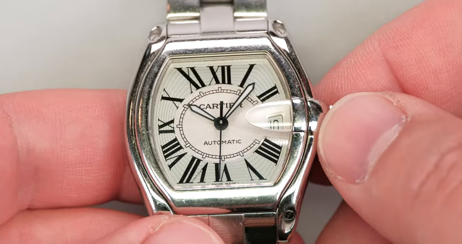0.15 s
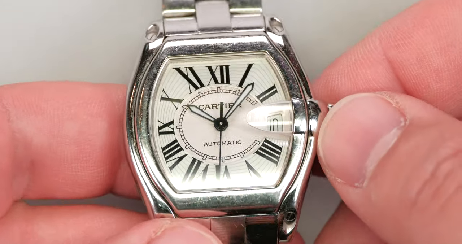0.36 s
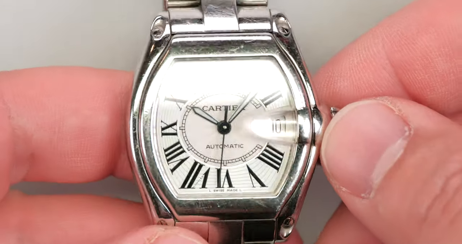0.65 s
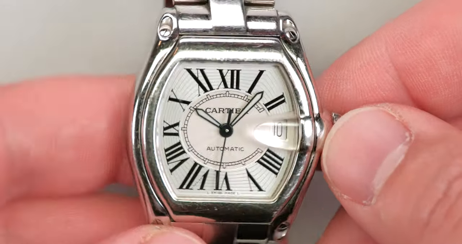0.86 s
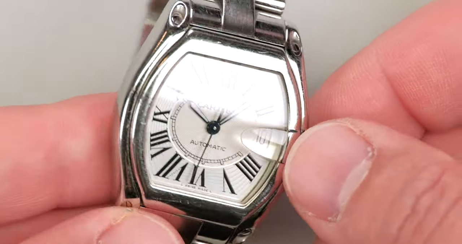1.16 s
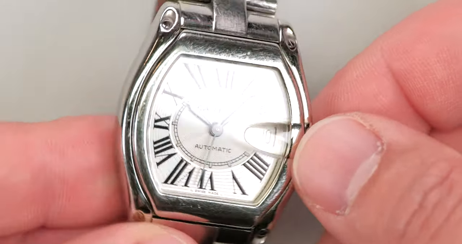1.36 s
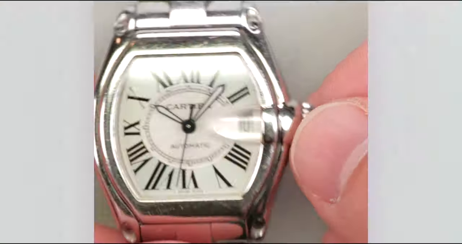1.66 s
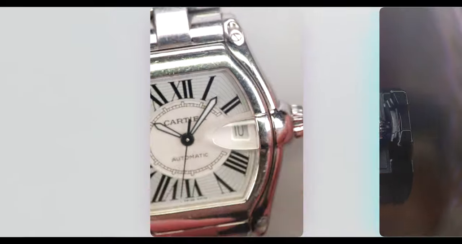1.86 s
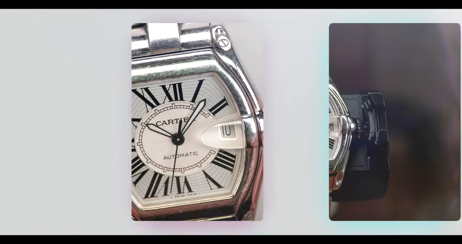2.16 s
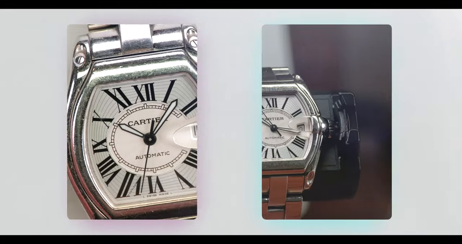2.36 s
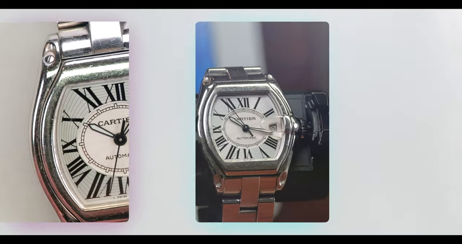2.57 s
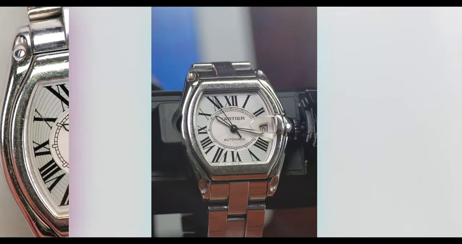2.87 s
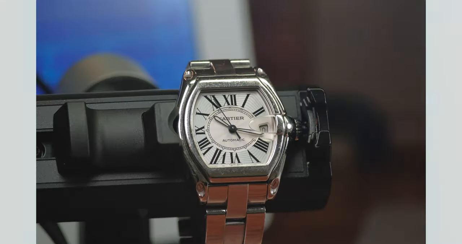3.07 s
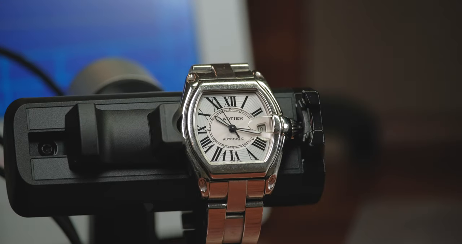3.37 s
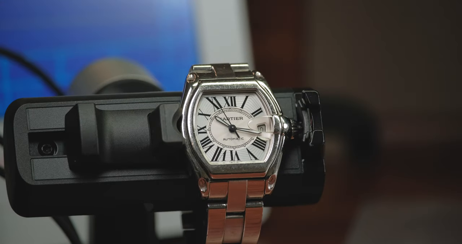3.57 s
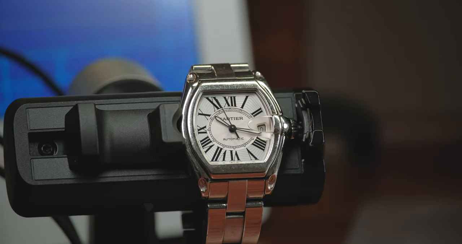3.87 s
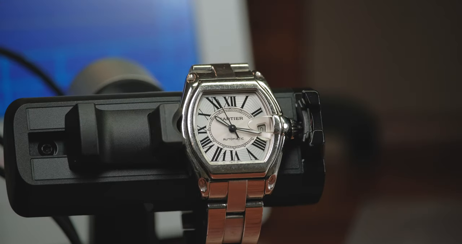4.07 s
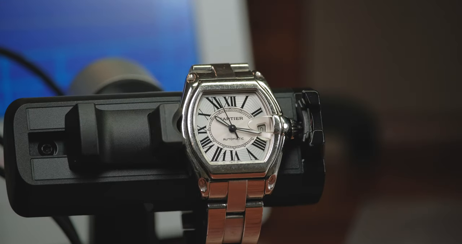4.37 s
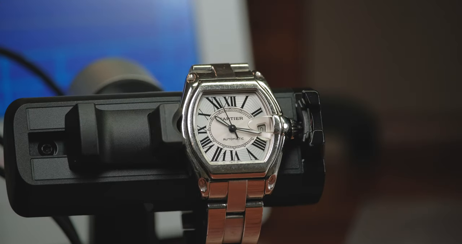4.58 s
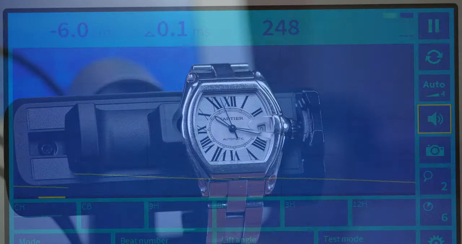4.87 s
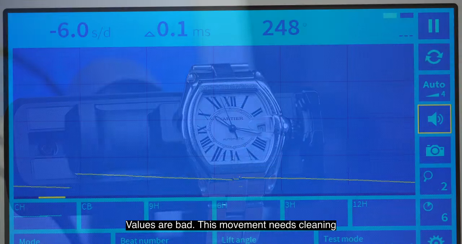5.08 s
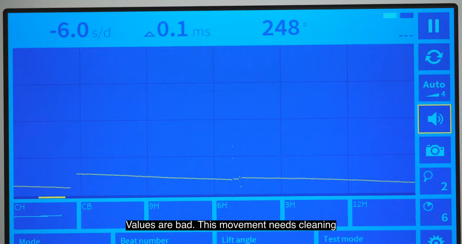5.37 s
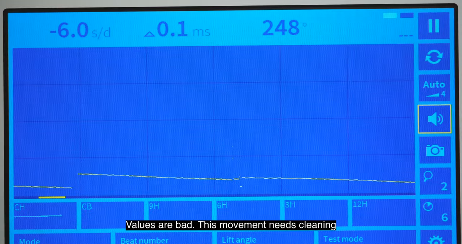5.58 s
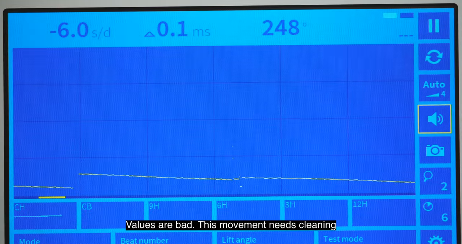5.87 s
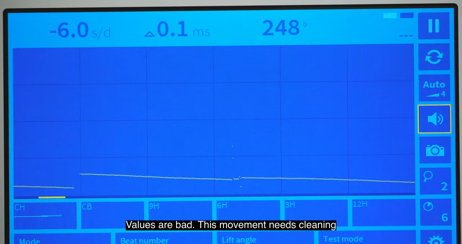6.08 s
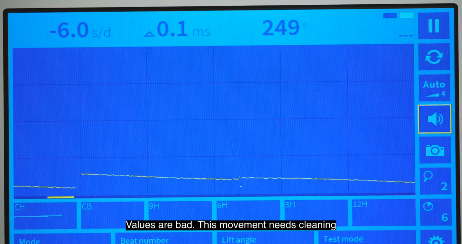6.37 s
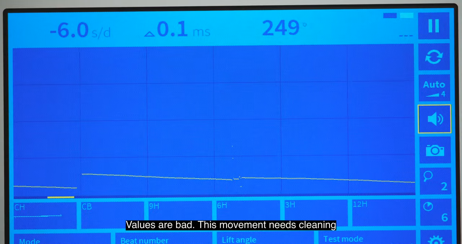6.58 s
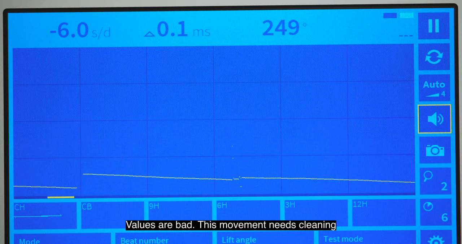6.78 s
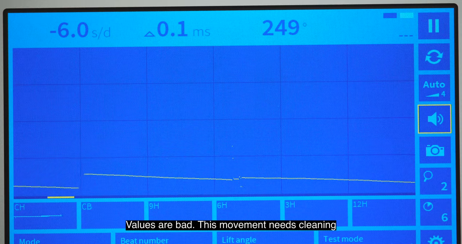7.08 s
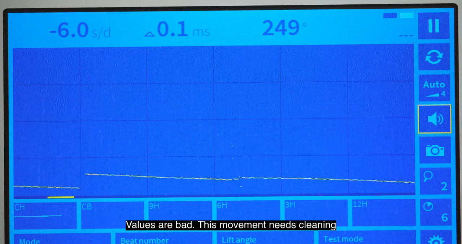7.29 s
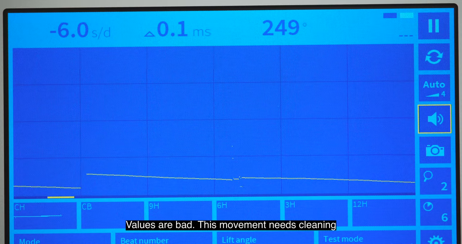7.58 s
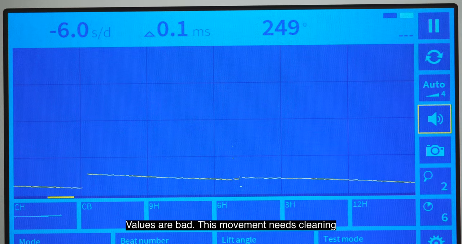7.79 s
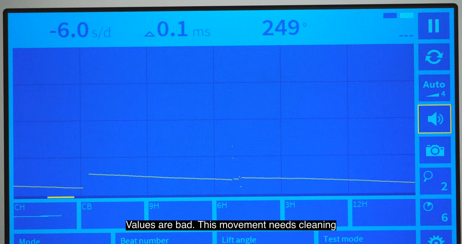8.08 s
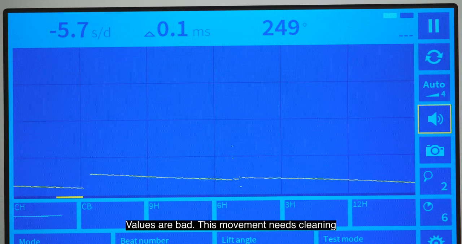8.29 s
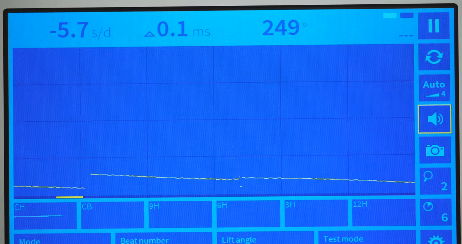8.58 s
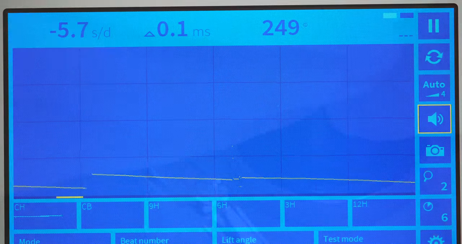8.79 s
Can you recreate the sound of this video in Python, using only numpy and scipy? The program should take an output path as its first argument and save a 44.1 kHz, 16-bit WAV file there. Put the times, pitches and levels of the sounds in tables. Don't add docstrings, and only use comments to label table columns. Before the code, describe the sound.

Close, dull and nearly mono at first: light steel clicks and soft skin rubbing on a watch case, then a hard snapping clack with scattered clicks. The sound widens into stereo hiss and low room rumble as a testing stand amplifies the movement: fast dry ticks, slightly uneven in strength, with a thin ringing haze. A deep soft thump of the bench comes halfway, then ticking goes on with a faint fan hum.

```python
import sys
import numpy as np
from scipy import signal
from scipy.fft import rfft, irfft
from scipy.io import wavfile
from scipy.ndimage import uniform_filter1d

SR = 44100
rng = np.random.default_rng(int(sys.argv[2]) if len(sys.argv) > 2 else 0)


def store_pcm(level_fs):
    pcm = np.round(np.clip(level_fs, -1, 1) * 32767).astype(np.int16)
    wavfile.write(sys.argv[1], SR, np.atleast_2d(pcm).T)


def ratio(d):
    e = np.asarray(d, float) / 20
    return 10 ** e


N = 393372

# frequency in Hz, level in dB, decay t60 in seconds.
THUD = [(205, -6.5, 0.11), (279, -9, 0.022), (327, -8.5, 0.026), (465, -2.5, 0.061), (574, -5, 0.033),
        (937, 0, 0.022), (1310, 7.5, 0.0069)]


def evened(x):
    return x / np.sqrt(np.mean(x ** 2) + 1e-20)


def read(points, hz):
    f, value = np.transpose(points)
    return np.interp(np.log(hz + 1), np.log(f + 1), value)


def add(mix, start_s, sound):
    part = mix[round(start_s * SR):][:len(sound)]
    part += sound[:len(part)]


def colour(x, shape):
    hz = np.fft.rfftfreq(len(x), 1 / SR)
    return irfft(rfft(x) * ratio(read(shape, hz)), len(x))


def ramp(start_s, end_s):
    return np.clip((np.arange(N) / SR - start_s) / (end_s - start_s), 0, 1)


def positions():
    stand = ramp(1.65, 3.03)
    leave_first = ramp(4.77, 5.19)
    second = ramp(4.76, 5.21)
    return np.array([1 - stand, stand * (1 - leave_first), second])


def heard(levels_db):
    return np.sqrt(((ratio(levels_db)[:, None] * positions()) ** 2).sum(0))


def ring(modes, luck, rise_s, spread_db, seconds, stray=0):
    hz, db, t60_s = np.transpose(modes)[:, :, None]
    t, count = np.arange(round(seconds * SR)) / SR, len(modes)
    level = ratio(db + spread_db * luck[:count, None] - 60 * t / t60_s)
    phase = luck[-count:, None]
    hz = hz * (1 + stray * np.sin(20 * phase))
    modes_sum = (level * np.sin(2 * np.pi * (hz * t + phase))).sum(0)
    sound = modes_sum * (1 - np.exp(-t / rise_s))
    return sound / abs(sound).max()


def tail(shape, t60_s, onset_s):
    t = np.arange(SR) / SR
    answer = colour(rng.standard_normal(SR), shape) * ratio(-60 * t / t60_s) * (1 - np.exp(-t / onset_s))
    return answer / np.linalg.norm(answer)


def wash(shape, patchy_db):
    # frequency in Hz, correlation from 0 to 1.
    likeness = [(50, .95), (200, .83), (2800, .76), (3600, .97), (5400, .97), (6300, .3), (16000, .28)]
    frames, hz = N // 512 + 5, np.fft.rfftfreq(2048, 1 / SR)
    a, b, c, d, patches = rng.standard_normal((frames, 1025, 5)).T
    patches = uniform_filter1d(patches, size=16, axis=0)
    patches = evened(uniform_filter1d(patches, size=6, axis=1))
    same = np.clip(read(likeness, hz), 0, 1)[:, None]
    mid = (a + 1j * b) * np.sqrt(1 + same)
    side = (c + 1j * d) * np.sqrt(1 - same)
    z = np.array([mid + side, mid - side]) * ratio(read(shape, hz)[:, None] + patchy_db * patches)
    return evened(signal.istft(z, nperseg=2048, noverlap=1536)[1][:, :N])


def wavering_tone(hz, waver_hz, level_db):
    waver = uniform_filter1d(rng.standard_normal(N), size=1500)
    waver = evened(uniform_filter1d(waver, size=1500))
    return ratio(level_db) * np.sin(2 * np.pi * np.cumsum(hz + waver_hz * waver) / SR)


def background():
    # frequency in Hz, level in dB per Hz.
    murmur_shape = [(35, -33.5), (60, -1), (103, -4.5), (197, -5.5), (417, -12), (577, -14), (639, -14.5),
                    (913, -11), (1010, -16), (1180, -15), (1900, -19), (2410, -24.5), (3500, -30.5),
                    (4550, -41), (7700, -120)]
    hiss_shape = [(300, -4), (2000, 6), (6500, 3.5), (12000, 3.5), (15500, 4), (15780, -2), (15900, -49)]
    rumble_shape = [(8, -16), (18, 16), (45, 1), (70, -15.5), (120, -53.5)]
    # peak in seconds, half length in seconds, rumble rise in dB.
    shakes = [
        (2.85, 0.34, 1.5),
        (4.05, 0.28, 3),
        (5.1, 0.4, 11),
        (6.108, 0.44, 4.5),
        (7.303, 0.36, 6),
        (8.45, 0.25, 10),
    ]
    clack_s, clack_rise_s, clack_hold_s = 1.613, 0.23, 0.11
    t = np.arange(N) / SR
    fades = positions()

    fan = wavering_tone(930, 3, level_db=-79) * (np.array([0, .45, .9]) @ fades)
    whine = wavering_tone(3245, 6, level_db=-86) * fades[2]

    shakes_db = sum(db * np.maximum(1 - abs(t - s) / half_s, 0) for s, half_s, db in shakes)
    rumble = wash(rumble_shape, 1.34).mean(0) * heard((-77.5, -67, -66)) * ratio(shakes_db)

    swell = ramp(clack_s - clack_rise_s, clack_s)
    stir = swell ** 3 * ratio(-54 - 70 * np.maximum(t - clack_s - clack_hold_s, 0))
    murmur = wash(murmur_shape + [(6000, -60)], 1.96) * np.hypot(heard((-74, -71, -69.5)), stir)
    linger = swell * ratio(-74 - 10 * (t - clack_s))
    hiss = wash(hiss_shape, 0.95) * np.hypot(heard((-82.5, -70.5, -70.5)), linger)
    return fan + whine + rumble + murmur + hiss


def knocks():
    # time in seconds, swing peak in dB.
    wobble = [
        (4.7, -51),
        (4.875, -46),
        (4.905, -30),
        (4.95, -28.5),
        (4.99, -34.5),
        (5.07, -35),
        (5.13, -39.5),
        (5.6, -48),
        (5.85, -66),
    ]
    # frequency in Hz, level in dB, decay t60 in seconds.
    bench = [
        (66, -52, 1.3),
        (77, -56, .9),
        (105, -54, .3),
    ]
    bench_s, first_swing_s, onset_s = 4.885, 4.895, .006
    swing_hz, kick_hz, settle_s, rebound_s = 20, 22.5, .07, .3
    s, db = np.transpose(wobble)
    t, out = np.arange(s[0], s[-1], 1 / SR), np.zeros(N)

    since = np.maximum(t - bench_s, 0)
    kick = (1 - np.exp(-since / onset_s)) * np.exp(-since / settle_s)
    hz = swing_hz + kick_hz * kick * np.cos(2 * np.pi * since / rebound_s)
    turns = np.cumsum(hz) / SR
    lean = np.minimum((t - s[0]) / .04, 1)
    swing = np.cos(2 * np.pi * (turns - np.interp(first_swing_s, t, turns)))
    add(out, s[0], lean * ratio(np.interp(t, s, db)) * swing)

    t = t - s[0]
    boom = sum(ratio(db - 60 * t / t60_s) * np.sin(2 * np.pi * hz * t) for hz, db, t60_s in bench)
    add(out, bench_s, (1 - np.exp(-t / onset_s)) * boom)
    return out


def handling():
    # time in seconds, rub level in dB.
    touches = [
        (0.752, -94),
        (0.794, -70.5),
        (1.064, -74),
        (1.18, -68),
        (1.234, -61),
        (1.35, -69.5),
        (1.388, -76),
        (1.47, -69),
        (1.55, -65),
    ]
    rub_shape = [(120, -36), (220, 12.5), (600, -0.5), (1200, -11.5), (3000, -27)]
    scrape_shape = [(500, -29), (1200, -10), (2300, -1), (3700, -2.0), (4500, -17), (9000, -19), (14000, -41)]
    slip_at_db, slip_db, slip_growth, grip_s = -60.5, -69, 1.7, 1.36
    t = np.arange(N) / SR

    body = ring(THUD, np.zeros(14), rise_s=0.0052, spread_db=0, seconds=0.4)
    rub = evened(signal.fftconvolve(rng.standard_normal(N), body)[:N])
    rub = rub + 1.14 * evened(colour(rng.standard_normal(N), rub_shape))

    slip_now = rng.random(N) < 2500 / SR
    slip_size = ratio(2.5 * np.minimum(rng.exponential(1, N), 5))
    scrape = colour(slip_now * slip_size * rng.standard_normal(N), scrape_shape)

    s, db = np.transpose(touches)
    pressure = ratio(np.interp(t, s, db, left=-120, right=-120))
    slipping = ratio(slip_db) * (pressure / ratio(slip_at_db)) ** slip_growth * (t < grip_s)
    return evened(rub) * pressure + evened(scrape) * slipping


def clicks():
    # start in seconds, ring, thud and snap levels in dB, ring pitch in Hz.
    contacts = [(0.4902, -49.5, -64, -49, 3020), (0.758, -55, -77, -55.5, 2930),
                (1.1452, -67, -66, -66, 4600), (1.3959, -62, -63.5, -70, 1820),
                (1.4317, -42, -53, -44.5, 2160), (1.4473, -61, -57, -54, 2220),
                (1.503, -50, -77, -51.5, 2750), (1.5584, -27, -39, -32, 4050),
                (1.5634, -32, -41, -41, 1620), (1.595, -47, -63, -54.5, 2660),
                (1.6291, -18.5, -31, -32, 2470), (1.645, -47, -51, -48, 3050),
                (1.6779, -32.5, -49, -42.5, 2370), (1.6866, -34, -40.5, -43, 2760),
                (1.6945, -53, -46.5, -47, 2730), (1.711, -56, -61, -45, 2780),
                (1.7278, -56, -48.5, -47, 2250), (1.74, -42, -55, -57, 2180), (1.7616, -46, -50, -56, 2190),
                (1.9777, -58, -65.5, -65, 4690)]
    # start in seconds, extra snap tilt in dB per octave.
    extra_tilts = [
        (0.4902, 6),
        (0.7576, -5),
        (1.503, 2.5),
    ]
    # frequency in Hz, level in dB, decay t60 in seconds.
    steel = [(1780, -5.5, .012), (2223, -1, 0.014), (2750, -5.5, 0.012), (3140, -2.5, 0.013),
             (3460, 0, 0.01), (3950, -2.5, 0.0091), (4940, -2, 0.0079)]
    # frequency in Hz, level in dB.
    snap_shape = [(2500, -40), (4500, -3), (6500, -4), (9000, -3.5), (12000, -1), (14500, -7.5),
                  (16500, -1)]
    room_shape = [(60, -9), (130, -8), (200, -3), (500, -8), (1400, -13), (2200, -10), (2700, -1),
                  (3300, 0), (3800, -10), (5200, -13), (6200, -26), (16000, -38)]
    out, blows, t = np.zeros(N), np.zeros(N), np.arange(2000) / SR
    noises = rng.standard_normal((len(contacts), 2000))
    lucks = rng.standard_normal((len(contacts), 14))
    for (s, ring_db, thud_db, snap_db, hz), luck, noise in zip(contacts, lucks, noises):
        tilt_db = 0.5 + 0.55 * (snap_db - ring_db) - 12 * np.log2(hz / 2500)
        tilt_db += sum(db for at, db in extra_tilts if abs(at - s) < .005)
        snap = evened(colour(noise, [(f, db + tilt_db * np.log2(f / 9000)) for f, db in snap_shape]))
        snap_fall = ratio(snap_db + 3.5 - 60 * t / 0.01) + ratio(snap_db - 10 - 60 * t / 0.051)
        near = [(f, db - 10 * abs(np.log2(f / hz)), t60_s) for f, db, t60_s in steel]
        ringing = ring(near, luck, rise_s=.0008, spread_db=1.5, seconds=.06)
        thud = ring(THUD, luck[::-1], rise_s=.0006, spread_db=1.5, seconds=.3)
        add(out, s, snap_fall * snap)
        add(out, s + .0006, ratio(ring_db) * ringing)
        add(out, s + .0006, ratio(thud_db + 6) * thud)
        add(blows, s, ratio([ring_db]))
    room = tail(room_shape, t60_s=0.73, onset_s=0.0012)
    return out + ratio(2.5) * signal.fftconvolve(blows, room)[:N]


def escapement(count, start_s, fade, kinds, uneven, modes, shimmer, halo, halo_db, halo_t60_s):
    # frequency in Hz, level in dB.
    crack_shape = [(1500, -19), (3200, -10.5), (4200, 1), (5600, 3), (6300, -23.5), (10000, -15),
                   (15000, -26)]
    beat_s, lock_jitter_s, blow_jitter_db = .12503, .0004, 1.0
    crack_db, crack_t60_s = -13.5, 0.016
    after_ring_db, after_ring_t60_s = 5.5, 0.046
    out, blows, cracks = np.zeros((3, N))
    burst = ratio(crack_db - 60 * np.arange(900) / SR / crack_t60_s)
    changes = {int((s - start_s) / beat_s + .5): np.array(db) for s, *db in uneven}
    for k, luck in enumerate(rng.standard_normal((count, 3, 34))):
        free_s = start_s + k * beat_s
        free_db, push_db, lock_db, shine_db, wait_s = kinds[k % 2]
        fade_db = 20 * np.log10(fade[round(free_s * SR)] + 1e-3)
        change_db = changes.get(k, blow_jitter_db * luck[:2, -1])
        free_db, lock_db = np.array([free_db, lock_db]) + change_db + fade_db
        lock_s = free_s + wait_s + lock_jitter_s * luck[2, -1]
        steps = [(free_s, free_db - 3.0, -2.5),
                 (free_s + .0040, free_db + push_db, -1.5),
                 (lock_s - .0008, lock_db, -2.5)]
        for (s, db, shine_rel_db), chance in zip(steps, luck):
            body = ring(modes, chance[:22], rise_s=.002, spread_db=2.5, seconds=.05, stray=.035)
            shine = ring(shimmer, chance[22:], rise_s=.0007, spread_db=4, seconds=.03, stray=.01)
            add(out, s, ratio(db) * body)
            add(cracks, s, ratio(db) * burst)
            add(out, s, ratio(shine_db + fade_db + shine_rel_db) * shine)
        blow_db = .5 * (max(free_db, lock_db) + fade_db + 46) - 40
        add(blows, lock_s, ratio(blow_db) ** 2 * np.ones(1))
    t = np.arange(SR) / SR
    dying = ratio(-60 * t / halo_t60_s) ** 2
    after = ratio(after_ring_db - 60 * t / after_ring_t60_s) ** 2
    dying = (dying + after) / dying.sum()
    ring_on = np.sqrt(abs(signal.fftconvolve(blows, dying)[:N]))
    out += cracks * evened(colour(rng.standard_normal(N), crack_shape))
    return out + ratio(halo_db) * ring_on * evened(wash(halo, patchy_db=2.5).mean(0))


def first_position():
    # unlocking dB, push over unlocking dB, locking dB, shimmer dB, locking delay in seconds.
    kinds = [
        (-46, -4.5, -44.5, -65.5, .0091),
        (-46.5, -2, -42.5, -60.5, .0094),
    ]
    # beat time in seconds, unlocking change in dB, locking change in dB.
    uneven = [(2.0, -3, 0.5), (2.12, 3.5, 1.5), (2.25, 1, 0), (2.75, -1, 0.5), (3.0, 0, 1), (4.25, 2, -4),
              (2.5, 1.5, 1.5), (2.62, -1, 0), (3.12, -1.5, -3.5), (3.25, 1, 2), (3.5, 3, -17), (3.62, 5, 1),
              (3.75, 0, 1), (3.87, 2, 0.5), (4.37, 2, 0), (4.62, -1, 1.5), (4.75, 3.2, -3.5),
              (4.87, 1.5, 1), (5.0, -1, 3)]
    # frequency in Hz, level in dB, decay t60 in seconds.
    modes = [(1152, -27.5, 0.045), (1930, -13, 0.016), (2900, -21.5, 0.0077), (2940, -17, 0.021),
             (3794, 1.5, 0.0097), (4200, 1, 0.0054), (4537, 1.5, 0.012), (4832, -2, 0.025),
             (5530, -5.5, 0.023), (6060, -14, 0.0097)]
    shimmer = [(10000, 7, 0.013), (12823, 12, 0.027), (13200, -3, .008), (14500, 16, .01)]
    # frequency in Hz, level in dB.
    halo = [(800, -20), (2000, -19), (2700, -22), (3700, -15), (4150, -11), (4400, -5), (4600, -4),
            (4800, 0), (4900, -3), (5130, -16), (5480, -9), (5750, -14), (6100, -28), (9000, -44)]
    return escapement(27, 1.8648, positions()[1], kinds, uneven, modes, shimmer, halo,
                      halo_db=11.7, halo_t60_s=1.0)


def second_position():
    # unlocking dB, push over unlocking dB, locking dB, shimmer dB, locking delay in seconds.
    kinds = [
        (-45, -1.5, -41, -56.5, .0087),
        (-43, -5.5, -41.5, -53, .0097),
    ]
    # beat time in seconds, unlocking change in dB, locking change in dB.
    uneven = [(5.41, 0, 1.5), (5.53, 1.1, 2), (5.78, 2.5, -0.5), (5.91, -2, -3.5), (6.15, 1.5, -5),
              (6.28, 0, -3), (6.41, -1, -2.5), (6.53, -2, 1), (6.66, -0.5, 3), (7.16, 5, -4),
              (7.28, -1.5, -1), (7.41, 2, 2), (7.66, 4, -19), (7.78, .6, 1.5), (8.03, -2.5, -2),
              (8.16, 0.5, 1), (8.41, 3.5, -2.5), (8.53, 1, 1), (8.66, 2.5, 2.5)]
    # frequency in Hz, level in dB, decay t60 in seconds.
    modes = [(1220, -20, 0.021), (1567, -28, 0.029), (1874, -21, 0.028), (2226, -27, 0.04),
             (2863, -18.5, 0.021), (3500, -9, 0.013), (4110, 0.5, 0.011), (4690, 0, 0.012),
             (5030, -1, 0.015), (5530, 1, 0.013), (5970, -7.5, 0.011)]
    shimmer = [(10314, -10, .014), (12955, -1, .016), (13800, -5, .009), (14200, 0, .011),
               (15000, -1.5, .012), (15500, -12, .01)]
    # frequency in Hz, level in dB.
    halo = [(2600, -18), (3300, -12), (3850, -9), (4200, -5), (4310, 0), (4410, -5), (4500, -1), (4700, -7),
            (5200, -11), (5500, -11), (5630, -6), (5800, -13), (6200, -25), (9000, -44)]
    return escapement(35, 4.6501, positions()[2], kinds, uneven, modes, shimmer, halo,
                      halo_db=9.1, halo_t60_s=1.0)


def scene():
    pair = background()
    mono = colour(pair.mean(0), [(8000, 0), (14600, -3), (15100, -30)])
    width = ramp(1.95, 2.25)
    room = mono + width * (pair - mono)
    return room + knocks() + handling() + clicks() + first_position() + second_position()


def top_cut(x):
    return signal.sosfilt(signal.butter(12, 16850, fs=SR, output="sos"), x)


def record(dry):
    edge = signal.firwin(301, 16350, window=("kaiser", 9), fs=SR)
    mix = signal.oaconvolve(dry, edge[None], "same")
    return top_cut(mix)


dry = scene()
out = record(dry)
store_pcm(out)
```